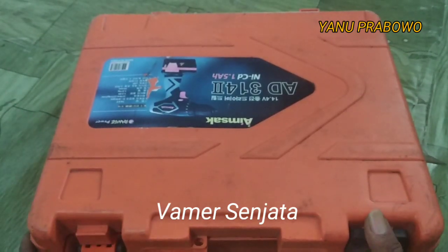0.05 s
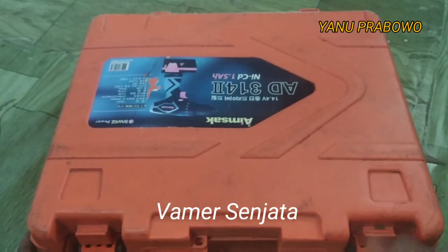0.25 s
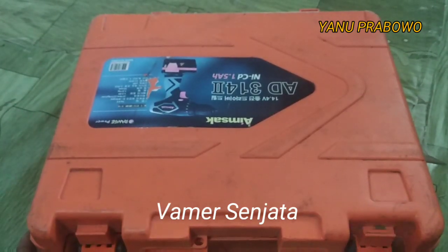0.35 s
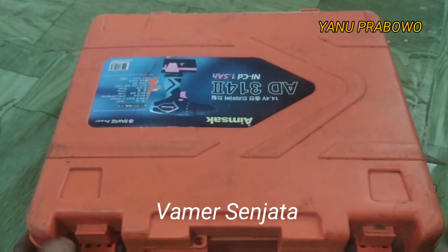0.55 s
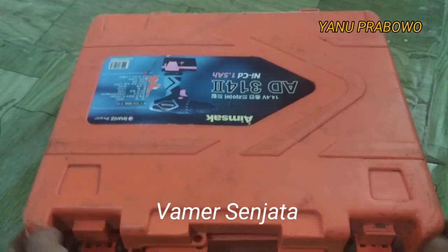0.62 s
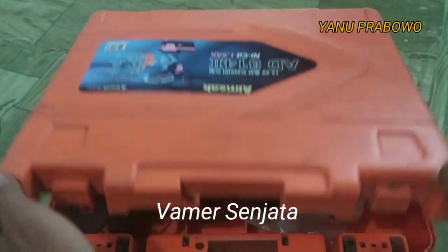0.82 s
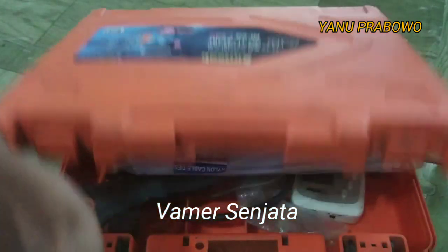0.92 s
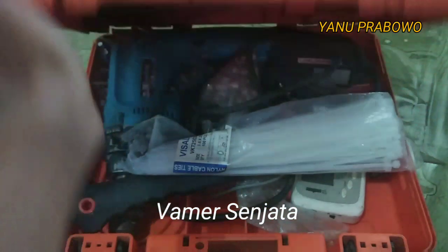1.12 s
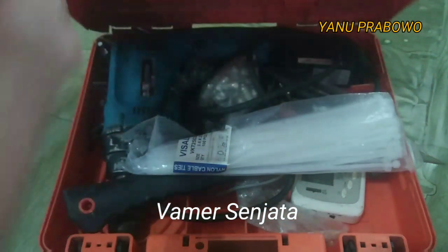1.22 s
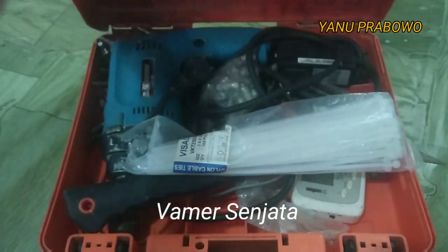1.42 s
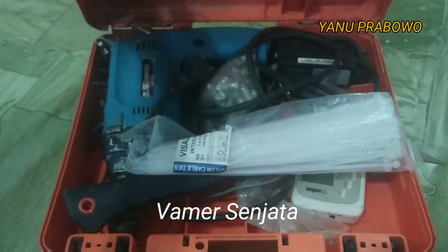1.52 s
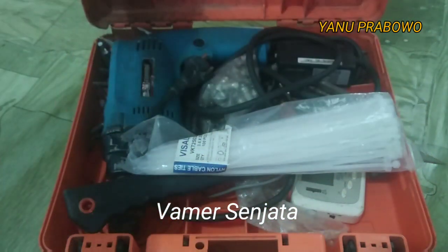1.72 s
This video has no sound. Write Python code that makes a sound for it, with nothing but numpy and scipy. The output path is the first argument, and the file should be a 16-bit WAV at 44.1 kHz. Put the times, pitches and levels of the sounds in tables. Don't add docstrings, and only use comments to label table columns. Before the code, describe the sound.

A hard plastic tool case is opened close to the microphone: light handling ticks, sharp latch snaps with hollow lid thuds, a loudest cluster midway, one small later rattle, then quiet hissy room tone.

```python
import sys
import numpy as np
from scipy import signal
from scipy.fft import rfft, irfft
from scipy.io import wavfile
from scipy.ndimage import uniform_filter1d

SR = 44100
rng = np.random.default_rng(int(sys.argv[2]) if len(sys.argv) > 2 else 0)


def file_out(sig):
    cols = np.atleast_2d(sig).T
    lim = np.clip(cols, -1, 1)
    pcm = np.round(lim * 32767).astype(np.int16)
    wavfile.write(sys.argv[1], SR, pcm)


def level_to_linear(level):
    exponent = np.asarray(level, float) / 20
    return 10 ** exponent


N = 77175


def band(x, hz, width):
    return signal.lfilter(*signal.iirpeak(min(hz, 0.45 * SR), hz / width, SR), x)


def bank(x, peaks):
    return sum((-1) ** k * level_to_linear(db) * band(x, hz, width) for k, (hz, width, db) in enumerate(peaks))


def peak(x, db):
    return x * level_to_linear(db) / np.abs(x).max()


def level(x, db):
    return x * level_to_linear(db) / np.sqrt(np.mean(x ** 2))


def add(out, x, s):
    i = max(int(s * SR), 0)
    out[i:i + len(x)] += x[:N - i]


def click(length):
    return 1.0 * (np.arange(length) == 0)


# pitch_hz, density_db (per Hz)
AIR = [(60, -32), (200, 0), (500, -10), (1000, -18), (3500, -19.5), (6500, -21), (10700, -11.5),
       (15500, -25)]


def air():
    table_hz, table_db = np.array(AIR).T
    hz = np.fft.rfftfreq(N, 1 / SR) + 1
    spec = rfft(rng.standard_normal(N)) * level_to_linear(np.interp(np.log(hz), np.log(table_hz), table_db))
    out = np.zeros(N)
    for centre_hz in 60 * 2.0 ** np.arange(9):
        steps = np.repeat(rng.standard_normal(N // 2000 + 1), 2000)
        walk = uniform_filter1d(steps, 2000)[:N]
        octave = np.clip(1 - np.abs(np.log2(hz / centre_hz)), 0, 1)
        waver_db = min(3000 / centre_hz, 2)
        out += level_to_linear(waver_db * walk) * irfft(spec * octave, N)
    return level(out, -56.5)


# band_hz, level_db, t60_s
ROOM = [(250, -21, 0.42), (467, -15, 0.37), (1000, -14, 0.53), (2000, -16.5, 0.25), (3600, -16.5, 0.45),
        (8000, -15.5, 0.28), (13000, -13, 0.42)]
ROOM_GAP_S = 0.002


def room():
    t = np.arange(N // 2) / SR
    tail = np.zeros(len(t))
    for hz, db, t60 in ROOM:
        noise = band(rng.standard_normal(len(t)), hz, 1.59 * hz)
        tail += level_to_linear(db) * 1000.0 ** (-t / t60) * level(band(noise, hz, 0.82 * hz), 0)
    return tail * np.clip(t / ROOM_GAP_S - 1, 0, 1) / np.sqrt(SR / 20)


# pitch_hz, width_hz, level_db
CRACK = [(6000, 730, -8), (9150, 1860, 8.5), (11100, 4100, 4.5), (13500, 4800, 4.5), (15100, 5100, 1)]


def crack_colour(x):
    return bank(x, CRACK)


RUB_STARTS_S = [0, .188, .188, .2, .488, .699, .7962, .811, .8455, .946, .966, .967, .976, .987, 1.0965,
                1.097, 1.1, 1.11, 1.325, 1.516, 1.605, 1.617]
# level_db, length_s, treble_db (re level), pitch_hz
RUBS = [(-48.5, .035, -19, 1350), (-42, 0.0054, -8, 10700), (-45, 0.0057, -15, 1100), (-43, .015, -32, 820),
        (-40, 0.057, -12, 1560), (-41, .008, -16, 3100), (-39, 0.0095, -8, 8700), (-36, 0.011, -9, 10000),
        (-37, 0.0053, -11, 2100), (-46.5, .0045, -1, 14000), (-38.5, 0.0031, -0.5, 960),
        (-52.5, 0.054, 1, 3030), (-39.5, .0054, -5, 10600), (-50.5, 0.046, -9.5, 10100),
        (-41.5, .013, -13, 1380), (-47, .011, -9, 13700), (-66.5, 0.085, 6.5, 6200),
        (-56, 0.052, -24, 1880), (-59, 0.026, 0, 1400), (-62, 0.18, -1, 9700), (-63, .054, -6, 3700),
        (-60, 0.059, 0, 1590)]
RUB_RISE_S, RUB_FADE, RUB_GRIT_DB = 0.0004, 0.65, 1


def rubs():
    t = np.arange(N) / SR
    noise, roughness = rng.standard_normal((2, N))
    grit = noise * level_to_linear(RUB_GRIT_DB * np.repeat(roughness, 64)[:N])
    wide = level(band(grit, 3000, 12600), -14)
    treble = level(crack_colour(grit), 0)
    out = np.zeros(N)
    for s, (db, length, treble_db, hz) in zip(RUB_STARTS_S, RUBS):
        rise = np.clip((t - s) / RUB_RISE_S, 0, 1)
        fade = np.exp(-np.maximum(t - s - length, 0) / (RUB_FADE * length))
        dull = level(band(grit, hz, min(0.59 * hz, 1800)), 0)
        out += rise * fade * level_to_linear(db) * (wide + dull + level_to_linear(treble_db) * treble)
    return out


SPREAD = 0.85


def swings(table, push_s, pair, pair_db, t60):
    near, far, t = np.zeros(N), np.zeros(N), np.arange(4096) / SR
    for s, db, hz, hold in table:
        modes = np.sin(2 * np.pi * hz * t) + level_to_linear(pair_db) * np.sin(2 * np.pi * pair * hz * t)
        push = 1 - np.exp(-t / push_s)
        damping = 1000.0 ** (-np.maximum(t - hold, 0) / t60)
        ring = peak(modes * push * damping, db)
        many = band(band(click(len(t)), hz, SPREAD * hz), hz, SPREAD * hz)
        add(near, ring, s)
        add(far, level(many, 0) * np.std(ring), s)
    return near, far


# start_s, level_db, pitch_hz, swing_s
BOOMS = [(0, -36, 320, 0.00062), (.045, -38.5, 219, 0.015), (.194, -30.5, 283, 0.0067),
         (.205, -27, 261, 0.0059), (.218, -36, 335, 0.0099), (.229, -25.5, 238, 0.011),
         (.262, -71, 286, 0.017), (.30, -45.5, 250, 0.074), (.384, -39, 315, 0.0061),
         (.436, -26, 336, 0.0037), (.4948, -16, 271.4, 0.013), (.512, -35, 303.4, 0.044),
         (.53, -34, 423, 0.01), (.55, -35.5, 280.6, 0.039), (.653, -21.5, 269, 0.0096),
         (.668, -74, 306, 0.0054), (.685, -17.5, 286.2, 0.008), (.703, -31, 303.7, 0.017),
         (.742, -30, 278, 0.012), (.799, -27, 306, 0.0146), (.813, -17.5, 241, 0.0064),
         (.821, -26.5, 351, 0.0021), (.86, -40.5, 395, 0.025), (.965, -36.5, 436, 0.0087),
         (1.006, -43.5, 362, 0.023), (1.109, -39, 410, 0.0068), (1.315, -53, 259, 0.0044),
         (1.348, -54.5, 360, 0.012), (1.432, -74, 216, 0.017)]


def booms():
    near, far = swings(BOOMS, push_s=0.00077, pair=1.55, pair_db=-10, t60=0.026)
    return near, level_to_linear(-0.5) * far


# start_s, level_db, pitch_hz, swing_s
KNOCKS = [(.041, -40, 1450, .002), (.196, -30.5, 1280, 0.0026), (.385, -43.5, 1000, 0.0034),
          (.434, -23.5, 977, 0.0019), (.495, -19, 1170, 0.00062), (.528, -32, 607, 0.0071),
          (.651, -32.5, 910, 0.0065), (.685, -16.5, 1200, 0.002), (.686, -29.5, 922, 0.008),
          (.703, -28, 1040, 0.0031), (.496, -25.5, 942, 0.0066), (.797, -30.5, 940, 0.001),
          (.815, -10.5, 930, 0.0012), (.816, -14.5, 2000, 0.0015), (.822, -23.5, 1000, 0.0056),
          (.832, -22.5, 900, 0.002), (.8462, -17, 1242, 0.0049), (.856, -41, 1240, 0.0097),
          (.893, -48, 1360, 0.0041), (.964, -34, 1600, 0.0029), (1.0975, -26.5, 1200, 0.002),
          (1.102, -37.5, 2030, 0.0083), (1.1025, -37, 1200, 0.0013), (1.1065, -33, 1300, 0.003),
          (1.126, -35, 700, 0.0076), (1.14, -54, 950, 0.01), (1.2125, -42, 680, 0.0032),
          (1.332, -57, 1740, 0.021)]


def knocks():
    near, far = swings(KNOCKS, push_s=0.00014, pair=1.4, pair_db=-13.5, t60=0.01)
    return near, level_to_linear(0.5) * far


# (pitch_hz, width_hz, level_db)
PARTS = [
    ([(.4342, -11.5), (.4356, -19.5)], [(3360, 430, -2.5), (4330, 450, -1), (5300, 270, -4), (5710, 230, 1.5), (6300, 180, 2), (6820, 270, 2), (8580, 320, -3.5), (10550, 230, -9), (11390, 580, 0.5)]),
    ([(.4950, -8.5), (.4968, -12)], [(3120, 450, 2.5), (3790, 130, -1), (7500, 250, -4.5), (9220, 650, -5), (9500, 220, -23), (10500, 230, -6), (12700, 230, -14), (14300, 250, -23)]),
    ([(.6852, -8.5), (.6866, -26)], [(3310, 120, -2), (4390, 170, -0.5), (6300, 260, -10), (7860, 570, 1), (8830, 740, -0.5), (10500, 440, -6), (13400, 390, -11), (15100, 340, -18)]),
    ([(.8158, -19), (.8182, -12.5)], [(3030, 170, -1), (5740, 600, -2.5), (7000, 190, -1), (7730, 230, -1.5), (8900, 160, -20), (11020, 210, -0.5), (11400, 300, -5), (12100, 230, -1)]),
    ([(.8474, -6.5), (.8487, -22)], [(3166, 206, 1), (4370, 180, -2.5), (4980, 480, -7.5), (6270, 350, -4), (8160, 430, -2), (9170, 510, -1.5), (11160, 300, -4.5), (12100, 650, -4)]),
    ([(1.0978, -20.5), (1.1000, -28), (1.1022, -32), (1.1040, -26), (1.1082, -35)], [(2000, 290, -4), (3000, 300, 1.5), (5950, 230, -2.5), (7700, 270, -5), (8800, 360, -0.5), (11900, 300, -2), (13200, 360, -4), (15200, 300, -5)]),
]
BLOW_S, PART_SPREAD = 0.00026, 3.9


def parts():
    near, far, t = np.zeros(N), np.zeros(N), np.arange(1024) / SR
    for blows, modes in PARTS:
        power = np.zeros(len(t) // 2 + 1)
        for hz, width, db in modes:
            power += np.abs(level_to_linear(db) * rfft(band(click(len(t)), hz, PART_SPREAD * width))) ** 2
        wide = level(np.roll(irfft(np.sqrt(power)), shift=40), 0)
        for s, db in blows:
            spec = rfft(rng.standard_normal(len(t)) * t * np.exp(-t / BLOW_S))
            scrape = irfft(spec / np.abs(spec) ** 0.7)
            ring = peak(bank(scrape * np.exp(-t / (4 * BLOW_S)), modes), db)
            add(near, ring, s)
            add(far, wide * np.std(ring), s)
    return near, level_to_linear(2.5) * far


# start_s, latch_db, crack_db (re latch), latch_pitch_hz, crack_pitch_hz
SNAPS = [(0.0393, -39, -22, 3450, 6000), (.2050, -36.5, 14.5, 2840, 9520), (0.298, -51, -8, 2800, 13000),
         (0.3857, -29.5, -5, 2850, 5700), (0.4342, -20.5, 2.5, 2420, 12200), (0.4627, -34, 0, 2700, 6960),
         (0.495, -14, 5, 2920, 13500), (0.563, -25, -4, 2740, 5700), (0.6513, -24.5, -10, 2800, 8450),
         (0.669, -57.5, -23, 2900, 6960), (0.6852, -15.5, -4, 3180, 12100), (0.7027, -40, -4, 3540, 8000),
         (0.7391, -23.5, 1, 2070, 10300), (0.816, -18.5, 6, 2000, 11200), (0.8166, -24.5, 5.5, 5740, 13500),
         (0.815, -19.5, -6, 3200, 6140), (0.8467, -18.5, 6, 2460, 7750), (0.963, -22.5, -2.5, 3070, 10400),
         (1.0984, -44, 6, 3000, 6000), (1.126, -33.5, -6, 2270, 5140)]
RISE_S, CRACK_S, FADE_S, SAG_DB = 0.0003, 0.0028, 0.0004, -11
LATCH_Q = 6.5


def latch(x, hz):
    width = hz / LATCH_Q
    main = band(band(x, hz, width), hz, 2 * width)
    return main + 0.25 * band(x, 1.34 * hz, width) + 0.52 * band(x, 2030, 2070)


def snaps():
    near, far, t = np.zeros(N), np.zeros(N), np.arange(1024) / SR
    fade = np.exp(-np.maximum(t - CRACK_S, 0) / FADE_S)
    shape = np.clip(t / RISE_S, 0, 1) * level_to_linear(SAG_DB * t / CRACK_S) * fade
    tick = click(len(t))
    for s, db, crack_db, hz, top_hz in SNAPS:
        spec = rfft(rng.standard_normal(len(t)) * shape)
        burst = irfft(spec / np.abs(spec) ** 0.5) * np.sqrt(shape)
        ring = peak(latch(burst, hz), db)
        crack = peak(crack_colour(burst) + 1.95 * band(burst, top_hz, 880), db + crack_db)
        add(near, ring + crack, s)
        ring_far = level(band(tick, hz, SPREAD * hz), 0) * np.std(ring)
        crack_far = level(crack_colour(tick), 0) * np.std(crack)
        add(far, ring_far + crack_far, s)
    return near, level_to_linear(2.5) * far


def dip(x):
    return x - 0.3 * band(x, 596, 200)


def scene():
    tone, shut, opened = air(), room(), room()
    rub = rubs()
    struck = [booms(), knocks(), parts(), snaps()]
    near = dip(sum(close for close, _ in struck)) + rub
    before = level_to_linear(-8) * click(N)
    far = dip(sum(distant for _, distant in struck)) + rub + before
    half = np.sin(2 * np.pi * 1.672 * np.arange(N) / SR) ** 2
    echoes = signal.fftconvolve(far * half, shut)[:N]
    echoes += signal.fftconvolve(far * (1 - half), opened)[:N]
    return (near + echoes + tone)[None]


def top_cut(x):
    return signal.sosfilt(signal.butter(12, 16510, fs=SR, output="sos"), x)


def record(dry):
    x = signal.sosfilt(signal.butter(3, 186, "high", fs=SR, output="sos"), dry)
    low = signal.sosfilt(signal.ellip(8, 0.3, 60, 15300, fs=SR, output="sos"), x)
    top = signal.sosfilt(signal.ellip(8, 0.3, 70, 16500, fs=SR, output="sos"), x)
    return top_cut(low + level_to_linear(-29) * top)


dry = scene()
out = record(dry)
file_out(out)
```